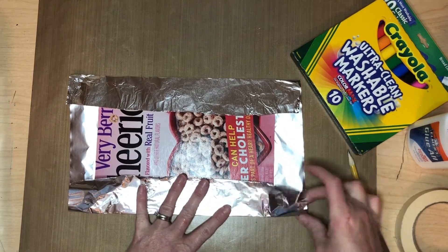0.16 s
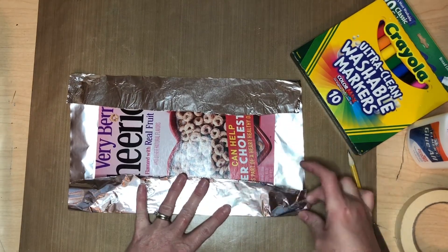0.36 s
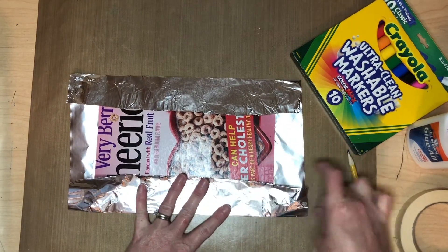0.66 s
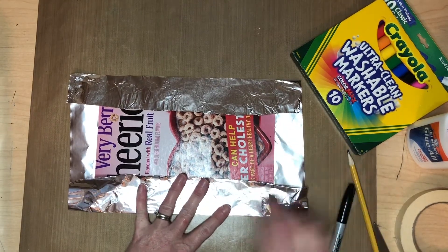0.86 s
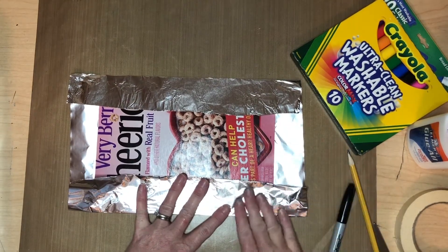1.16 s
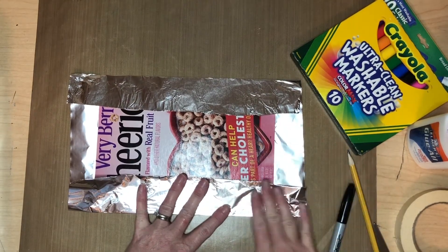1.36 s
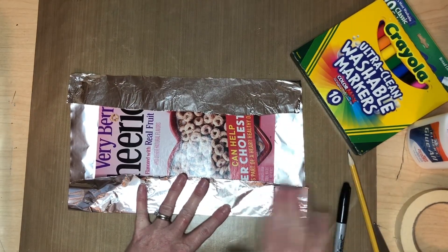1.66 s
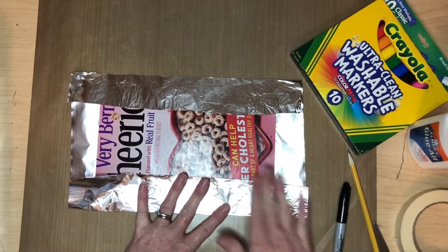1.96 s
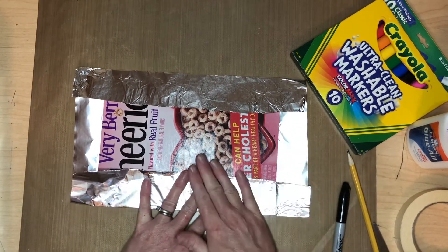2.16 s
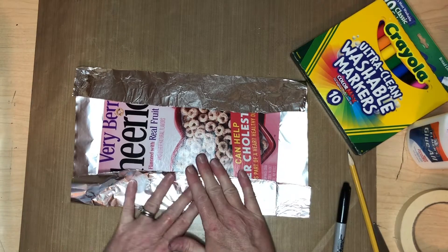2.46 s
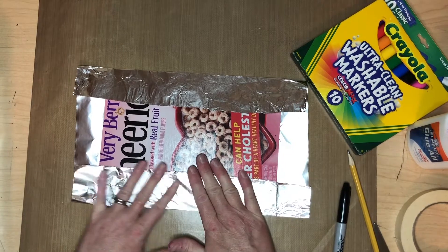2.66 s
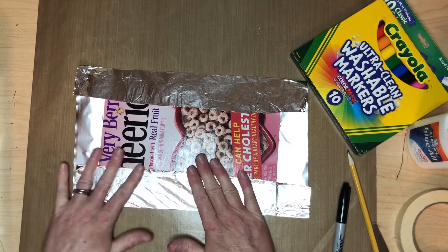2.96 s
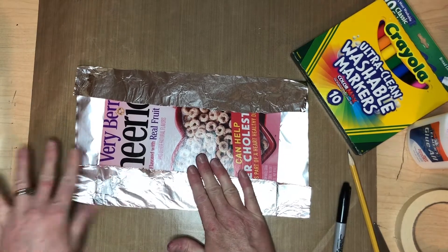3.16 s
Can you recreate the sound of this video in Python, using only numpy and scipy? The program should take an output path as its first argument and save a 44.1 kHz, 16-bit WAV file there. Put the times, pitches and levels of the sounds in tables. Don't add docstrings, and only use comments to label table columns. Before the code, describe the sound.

Thin metal foil is pinched, folded and pressed flat over cardboard on a table, ticking and crackling in three bursts with quiet gaps, dull fingertip knocks and low thuds, recorded close in a small room.

```python
import sys
import numpy as np
from scipy import signal
from scipy.fft import rfft, irfft
from scipy.io import wavfile
from scipy.ndimage import uniform_filter1d

SR = 44100
rng = np.random.default_rng(int(sys.argv[2]) if len(sys.argv) > 2 else 0)


def to_linear_factor(level_db):
    exponent = np.asarray(level_db, float) / 20
    return 10 ** exponent


def generate_wav(signal):
    frames = np.transpose(np.atleast_2d(signal))
    scaled = np.clip(frames, -1, 1) * 32767
    pcm = np.round(scaled).astype(np.int16)
    wavfile.write(sys.argv[1], SR, pcm)


N = 145530

# [f/Hz, level/dB per Hz]
AIR_TONE = [(30, -16), (50, -2), (235, -4.5), (606, -8), (900, -11.5), (1650, -16), (6500, -23),
            (15500, -28)]
AIR_DB = -68.5
# [f/Hz, level/dB per Hz]
EARLIER_RUSTLE_TONE = [(300, -6), (600, 3), (1300, -4.5), (1800, 0), (4400, -2), (15000, -24)]
EARLIER_RUSTLE_DB, EARLIER_RUSTLE_T60_S = -51.5, 0.3

# [t/s, level/dB]
PINCH_PRESSURE = [
    (0.129, -73),
    (.14, -54),
    (.28, -49.5),
    (.42, -71.5),
    (.55, -49),
    (0.609, -45),
    (.652, -66),
    (.67, -61),
    (.72, -67),
]
FOLD_PRESSURE = [
    (.98, -120),
    (0.997, -55),
    (1.3, -55),
    (1.44, -50),
    (1.622, -65.5),
    (1.645, -93),
    (1.768, -101),
    (1.774, -44),
    (1.96, -61.5),
]
SMOOTH_PRESSURE = [(1.93, -70), (2.06, -51.5), (2.14, -53.5), (2.21, -51), (2.27, -53.5), (2.36, -52),
                   (2.43, -56), (2.52, -49.5), (2.55, -45), (2.645, -47), (2.7, -50.5), (2.79, -49.5),
                   (2.881, -44.5), (2.947, -59.5), (2.959, -50.5), (3.03, -54), (3.09, -51), (3.16, -55.5)]
# [f/Hz, level/dB per Hz]
PINCH_COLOUR = [(820, -20), (1200, 1), (1760, -6.5), (3520, 0), (5200, -4.5), (8520, 0.5), (15500, -10)]
FOLD_COLOUR = [(700, -28), (1100, -3), (1830, -6), (3520, -2), (6850, -2.5), (10500, -4.5), (15500, -10)]
SMOOTH_COLOUR = [(600, -8.5), (1320, 0.5), (1810, -4.5), (3160, -4), (8630, -4.5), (15500, -9.5)]

# [t/s, level/dB, length/s, centre f/Hz]
CARD_KNOCKS = [(0.131, -42.5, 0.036, 1350), (0.2, -33.5, 0.007, 1210), (.262, -46.5, 0.045, 1060),
               (0.435, -48.5, 0.0085, 1290), (0.641, -55, 0.01, 1640), (1.194, -43.5, 0.0037, 1280),
               (1.297, -36.5, 0.0045, 1280), (2.08, -31.5, 0.01, 1790), (2.212, -39.5, 0.054, 1460),
               (2.8605, -26, 0.0019, 1040), (2.874, -28, 0.0048, 807), (2.88, -52, 0.036, 1050),
               (3.07, -48, 0.033, 1190)]
# [f/Hz, level/dB, t60/s]
CARD_MODES = [(507, 20, 0.0031), (765, -3, 0.057), (1100, 9, 0.026), (1328, 15.5, 0.014),
              (1640, 6.5, 0.045), (1950, 9.5, 0.013)]

# [t/s, peak level/dB, centre f/Hz, ring t60/s]
PINCH_CREASES = [(0.1326, -47, 4030, 0.11), (0.1406, -41.5, 4360, 0.071), (0.1875, -52, 3600.0, 0.057),
                 (0.2037, -31, 3420, 0.053), (0.2285, -45, 3400.0, 0.053), (0.2679, -45.0, 3600, 0.04),
                 (0.282, -41.0, 3500, 0.051), (0.2929, -34, 6700, 0.027), (0.3191, -34, 2900.0, 0.023),
                 (0.3467, -46, 3740, 0.049), (0.377, -43.5, 3060, 0.037), (0.3943, -43.5, 3270, 0.046),
                 (0.4324, -44.5, 3150, 0.13), (0.4384, -36.5, 3150, 0.033), (0.4652, -41.5, 3430, 0.055),
                 (0.5027, -45.5, 2640, 0.029), (0.5093, -42.5, 3270, 0.068), (0.5223, -45.5, 6140, 0.037),
                 (0.5716, -50, 3360, 0.047), (0.5856, -42.5, 3520, 0.1), (0.6081, -42, 3520, 0.12),
                 (0.6141, -36.5, 3420, 0.038), (0.6239, -37, 3750, 0.072), (0.63, -38.5, 3260, 0.021),
                 (0.6417, -32, 3960, 0.04), (0.65, -36.5, 3850, 0.018)]
FOLD_CREASES = [(0.9898, -39, 7200, 0.039), (1.0256, -42, 3680, 0.061), (1.0346, -44, 5800.0, 0.025),
                (1.05, -41.5, 9400, 0.031), (1.0534, -33.0, 4650, 0.041), (1.0815, -37.5, 9500, 0.03),
                (1.0997, -46, 4500.0, 0.021), (1.1233, -47, 3670, 0.024), (1.1381, -49, 5030, 0.039),
                (1.1442, -31.0, 4160, 0.021), (1.167, -39.5, 8250, 0.053), (1.1789, -31, 5800.0, 0.02),
                (1.1934, -28, 5300, 0.024), (1.203, -38, 4500.0, 0.016), (1.2341, -29.5, 5200, 0.026),
                (1.2385, -31, 4650, 0.019), (1.2555, -38, 4140, 0.035), (1.2633, -30.5, 6500, 0.024),
                (1.2935, -41.5, 5500.0, 0.059), (1.309, -29, 10100, 0.026), (1.3172, -44, 6400.0, 0.039),
                (1.3364, -29.5, 7300, 0.017), (1.3414, -35, 7200, 0.038), (1.3475, -39.5, 7700.0, 0.046),
                (1.3557, -39, 11100, 0.066), (1.3872, -44.0, 8500.0, 0.033), (1.3966, -38.5, 6730, 0.026),
                (1.41, -31.5, 7000.0, 0.019), (1.4222, -41, 7500, 0.03), (1.4333, -38.5, 10400, 0.044),
                (1.473, -48, 7800, 0.032), (1.4926, -47.5, 3730, 0.042), (1.61, -56.5, 8200, 0.073),
                (1.6264, -48, 9100, 0.025), (1.7715, -26.5, 9100, 0.023), (1.7783, -40.5, 7640, 0.051),
                (1.8572, -36.5, 8500, 0.041)]
SMOOTH_CREASES = [(2.0702, -40, 9600, 0.045), (2.0857, -32.5, 8650, 0.03), (2.109, -48, 13900, 0.029),
                  (2.1276, -47.5, 3540, 0.021), (2.166, -37, 4500.0, 0.024), (2.1801, -49, 2470, 0.13),
                  (2.185, -38, 9000, 0.034), (2.1879, -37.5, 4750, 0.033), (2.2169, -41.5, 5400, 0.046),
                  (2.2357, -45, 3880, 0.032), (2.257, -45.0, 10900, 0.018), (2.2873, -33, 8500, 0.026),
                  (2.304, -33.5, 8100, 0.028), (2.336, -39.5, 10300.0, 0.019), (2.3486, -35, 7540, 0.038),
                  (2.3764, -36.0, 9200, 0.025), (2.4112, -34.5, 7700.0, 0.033),
                  (2.4426, -30.5, 7900, 0.038), (2.4964, -48, 8600, 0.025), (2.5326, -34.5, 9050, 0.03),
                  (2.5749, -38.0, 3070, 0.033), (2.5988, -38.5, 8000, 0.038),
                  (2.6116, -38.0, 7400.0, 0.081), (2.6234, -44, 6700.0, 0.057),
                  (2.6318, -40, 5500.0, 0.094), (2.6372, -37.5, 8100, 0.1), (2.66, -44.5, 6130, 0.056),
                  (2.6926, -48.5, 6440, 0.062), (2.734, -44, 7240, 0.085), (2.7584, -45, 5440, 0.019),
                  (2.8153, -40, 6700.0, 0.029), (2.8738, -41, 8100.0, 0.076), (2.9574, -45, 7200, 0.028),
                  (2.967, -49, 5730, 0.017), (3.0828, -44.5, 8000, 0.069), (3.1088, -43, 9800.0, 0.099),
                  (3.139, -42.5, 7850, 0.035), (3.156, -39.5, 9600, 0.026)]
# [tick over ring level/dB, rise/s]
SNAP_SHAPES = [
    (6, 0.0012),
    (7.5, 0.00059),
    (5, 0.00044),
]

# [t/s, level/dB, push length/s, centre f/Hz]
TABLE_THUMPS = [(.32, -50.5, 0.0033, 384), (.994, -43.5, 0.019, 121), (1.39, -50, .05, 254),
                (1.45, -56, 0.049, 287), (1.771, -37, 0.0065, 268), (1.779, -31.5, 0.01, 112),
                (1.803, -42.5, 0.045, 141.3), (2.086, -33.5, 0.0059, 213), (2.102, -40.5, 0.0078, 109),
                (2.749, -48, 0.015, 300), (2.779, -43.5, 0.034, 126), (2.778, -44.5, 0.038, 270),
                (2.984, -41, 0.014, 289)]
# [f/Hz, level/dB, t60/s]
TABLE_MODES = [(70, -4, .06), (112, 1.5, 0.18), (140, 2.5, 0.21), (162.4, 3, 0.29), (225, -11.5, 0.066),
               (267.7, -0.5, 0.073), (370, -1, 0.045), (497, -11.5, 0.053)]
# [t/s, level/dB]
LEANING = [(.98, -62), (1.02, -72), (1.1, -85), (1.14, -57.5), (1.36, -60.5), (1.5, -80.5), (2.5, -65),
           (2.6, -54), (2.75, -88), (2.92, -56.5), (3.1, -91)]
# [f/Hz, t60/s]
ROOM_DECAY = [(200, 0.28), (3000, 0.22), (14000, 0.082)]
ROOM_DB = -12

CRACKLE_PER_S = (1900, 3000, 7000)
FLEX_DB = (-26, -13.5, -12.5)

FOCUS_DB, FOCUS_OCT, LUMP_DB = 10, 0.6, 3.6
THIN_DB, THIN_RATIO = 10, 3.2


def evened(x):
    return x / np.sqrt(np.mean(x ** 2) + 1e-20)


def read(points, hz):
    f, value = np.transpose(points)
    return np.interp(np.log(hz + 1), np.log(f + 1), value)


def level(points):
    s, db = np.transpose(points)
    return to_linear_factor(np.interp(np.arange(N) / SR, s, db, -120, -120))


def add(mix, s, sound):
    part = mix[round(s * SR):][:len(sound)]
    part += sound[:len(part)]


def band(edges_hz):
    sos = signal.butter(2, edges_hz, "bandpass", fs=SR, output="sos")
    return evened(signal.sosfilt(sos, rng.standard_normal(N)))


def coloured(tone, lines_db=0):
    lines = rng.standard_normal(N // 2 + 1)
    for _ in range(2):
        lines = uniform_filter1d(lines, size=200)
    db = read(tone, np.fft.rfftfreq(N, 1 / SR)) + lines_db * evened(lines)
    return evened(irfft(rfft(rng.standard_normal(N)) * to_linear_factor(db), N))


def air():
    t = np.arange(N) / SR
    fade = to_linear_factor(EARLIER_RUSTLE_DB - 60 * t / EARLIER_RUSTLE_T60_S)
    return to_linear_factor(AIR_DB) * coloured(AIR_TONE) + fade * coloured(EARLIER_RUSTLE_TONE, 3.5)


def sheet(tone, centre_hz, focus_db, lump_db):
    hz = abs(np.fft.fftfreq(1024, 1 / SR))
    lumps = evened(uniform_filter1d(rng.standard_normal(513), size=7))
    db = read(tone, np.clip(hz, 600, 15000))
    db = db + focus_db * np.exp(-(np.log2((hz + 1) / centre_hz) / FOCUS_OCT) ** 2)
    db = db + lump_db * lumps[np.rint(hz * 1024 / SR).astype(int)]
    db = db - 24 * np.log2(np.maximum(600 / (hz + 30), 1))
    db = db - THIN_DB * np.log2(np.maximum(centre_hz / THIN_RATIO / (hz + 30), 1))
    minimum_phase = np.exp(np.conj(signal.hilbert(db * np.log(10) / 20)))
    return evened(np.fft.ifft(minimum_phase).real[:512])


def tiny_creases(tone, per_s):
    size = to_linear_factor(6.5 * np.minimum(rng.exponential(1, N), 4.5))
    hits = size * (rng.random(N) < per_s / SR) * rng.choice([-1, 1], N)
    kind = rng.integers(0, 20, N)
    tail = to_linear_factor(-60 * np.arange(900) / SR / 0.018)
    grains = np.zeros(N)
    for k, hz in enumerate(np.geomspace(2400, 14000, 20)):
        response = sheet(tone, hz, FOCUS_DB, LUMP_DB)
        tick_and_tail = np.r_[4.0, rng.standard_normal(len(tail)) * tail]
        grains += signal.oaconvolve(hits * (kind == k), np.convolve(response, tick_and_tail))[:N]
    return evened(grains)


def crackle(pressure, tone, per_s, flex_db):
    clump_s, clump_db, scrape_db = 0.024, 2, -2.5
    memory = np.exp(-np.arange(2000) / (clump_s * SR))
    drift = evened(signal.oaconvolve(rng.standard_normal(N), memory)[:N])
    grains = tiny_creases(tone, per_s)
    scrape = evened(signal.oaconvolve(rng.standard_normal(N), sheet(tone, 1000, 0, 0))[:N])
    foil = to_linear_factor(clump_db * drift) * (grains + to_linear_factor(scrape_db) * scrape)
    card_flex = to_linear_factor(flex_db) * band((178, 435))
    return level(pressure) * evened(foil + card_flex)


def ring(modes, centre_hz, reach_db):
    t = np.arange(SR // 4) / SR
    out = np.zeros(len(t))
    for hz, db, t60 in modes:
        gain_db = db - reach_db * np.log2(hz / centre_hz) ** 2
        out += to_linear_factor(gain_db - 60 * t / t60) * np.sin(2 * np.pi * hz * t)
    return out


def touches(rows, modes, reach_db):
    out = np.zeros(N)
    for s, db, length, hz in rows:
        t = np.arange(max(round(length * SR), 8)) / SR
        rough = rng.standard_normal(SR // 8)[:len(t)]
        tone = np.sin(2 * np.pi * hz * t) / np.sqrt(20 * hz * length)
        push = np.hanning(len(t)) ** 0.5 * (rough + tone)
        hit = signal.oaconvolve(push, ring(modes, hz, reach_db * (1 + length / 0.03)))
        after = np.maximum(np.arange(len(hit)) / SR - length, 0)
        hit = hit * to_linear_factor(-60 * after * length / 0.0015)
        sos = signal.butter(3, hz / 2.4, "highpass", fs=SR, output="sos")
        hit = signal.sosfilt(sos, hit)
        add(out, s, to_linear_factor(db) * hit / abs(hit).max())
    return out


def card_knocks():
    return touches(CARD_KNOCKS, CARD_MODES, 5)


def snaps(rows, tone, tick_db, rise_s):
    snap_db, grit_db = 4.5, 3.0
    blur_db = 10.5
    out, lead = np.zeros(N), 300
    t = (np.arange(4096) - lead) / SR
    for s, db, hz, t60 in rows:
        noise, burst = rng.standard_normal(len(t)), rng.exponential(1, len(t))
        grit = evened(noise * to_linear_factor(grit_db * np.minimum(burst, 4)))
        drive = 0.36 * grit * np.where(t < 0, np.exp(t / rise_s), to_linear_factor(-60 * t / t60))
        drive[lead] += to_linear_factor(tick_db - blur_db * np.log2(t60 / 0.03))
        snap = signal.oaconvolve(drive, sheet(tone, hz, FOCUS_DB, LUMP_DB))
        peak = np.sqrt(np.max(uniform_filter1d(snap ** 2, size=44)) * 2)
        add(out, s - lead / SR, to_linear_factor(db + snap_db) * snap / peak)
    return out


def table_thumps():
    return touches(TABLE_THUMPS, TABLE_MODES, 14)


def sway():
    return uniform_filter1d(level(LEANING), size=900) * band((35.4, 71.6))


def room(x):
    taps = np.zeros(SR // 2)
    at = np.arange(200, len(taps) - 20, 20)
    taps[at + rng.integers(0, 20, len(at))] = rng.choice([-1., 1.], len(at))
    hz, t, z = signal.stft(taps, SR, nperseg=256)
    decay = to_linear_factor(-60 * t / read(ROOM_DECAY, hz)[:, None])
    tail = signal.istft(z * decay, SR, nperseg=256)[1]
    return signal.fftconvolve(x, tail / np.linalg.norm(tail))[:N]


def scene():
    gestures = zip((PINCH_CREASES, FOLD_CREASES, SMOOTH_CREASES),
                   (PINCH_PRESSURE, FOLD_PRESSURE, SMOOTH_PRESSURE),
                   (PINCH_COLOUR, FOLD_COLOUR, SMOOTH_COLOUR),
                   CRACKLE_PER_S, SNAP_SHAPES, FLEX_DB)
    near = np.zeros(N)
    for creases, pressure, tone, per_s, (tick_db, rise_s), flex_db in gestures:
        near += snaps(creases, tone, tick_db, rise_s)
        near += crackle(pressure, tone, per_s, flex_db)
    near = near + card_knocks() + table_thumps()
    return (near + to_linear_factor(ROOM_DB) * room(near) + sway() + air())[None]


def roll_off(x):
    return signal.sosfilt(signal.butter(12, 17000, fs=SR, output="sos"), x)


def record(dry):
    low_cut_hz, edge_hz, edge_db = 38, 15900, -40
    sos = signal.butter(2, low_cut_hz, "highpass", fs=SR, output="sos")
    x = signal.sosfilt(sos, dry)
    top_step = np.where(np.fft.rfftfreq(N, 1 / SR) > edge_hz, to_linear_factor(edge_db), 1)
    x = irfft(rfft(x) * top_step, N)
    return roll_off(x)


dry = scene()
out = record(dry)
generate_wav(out)
```